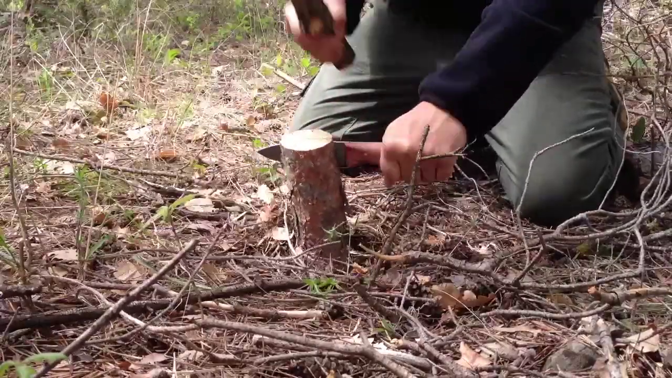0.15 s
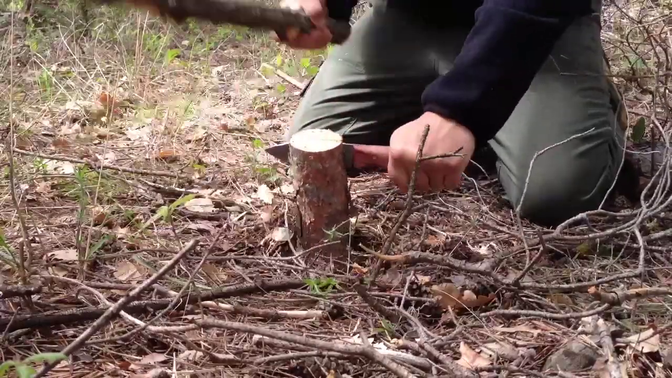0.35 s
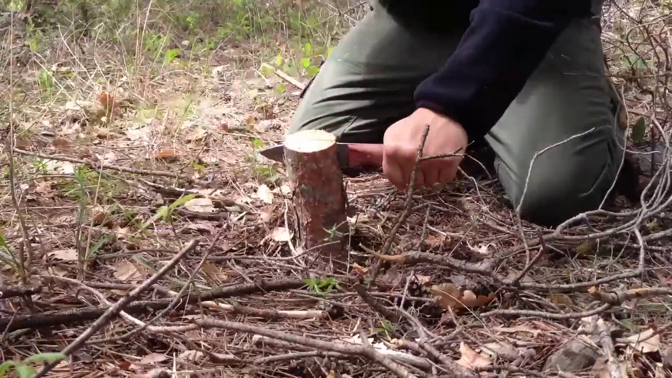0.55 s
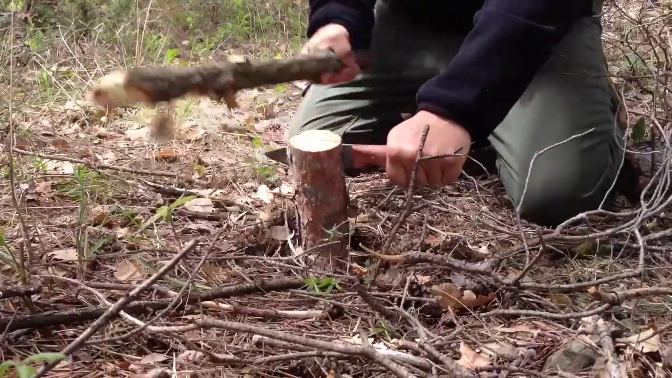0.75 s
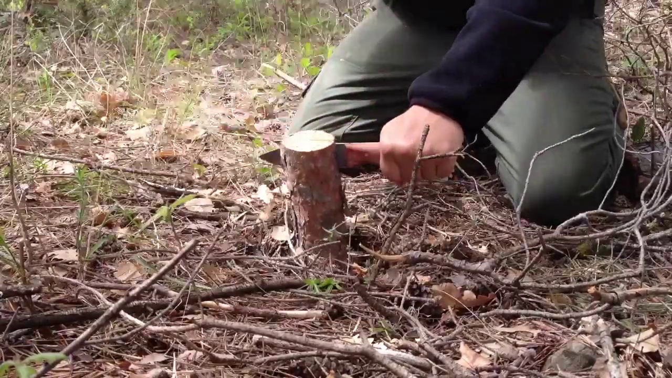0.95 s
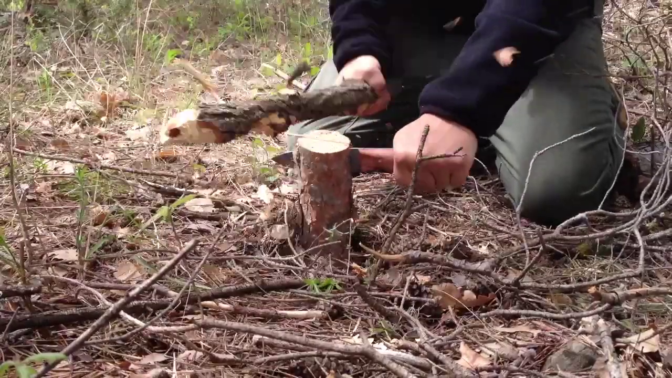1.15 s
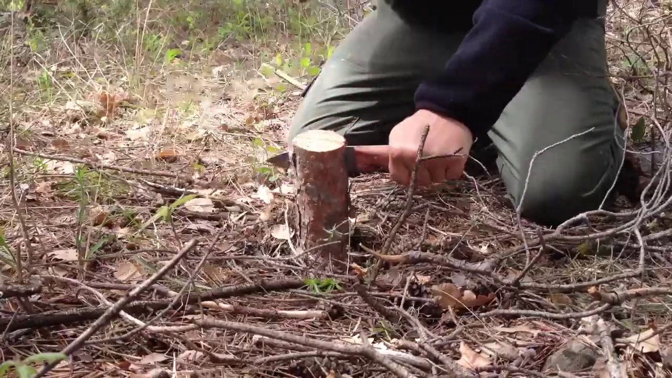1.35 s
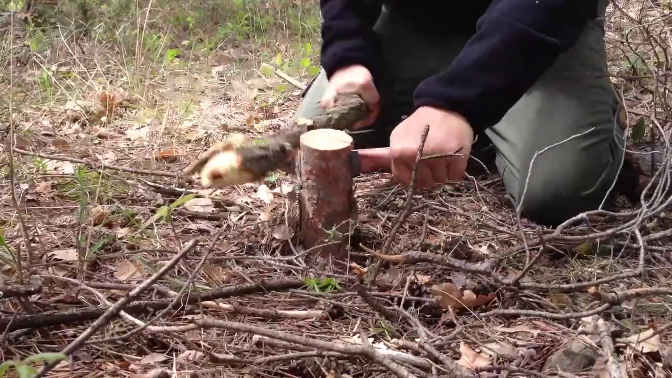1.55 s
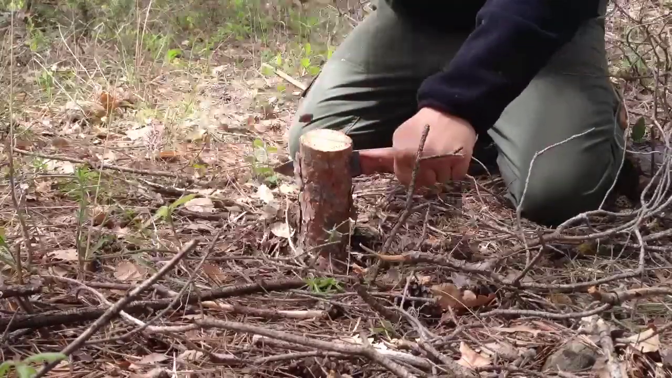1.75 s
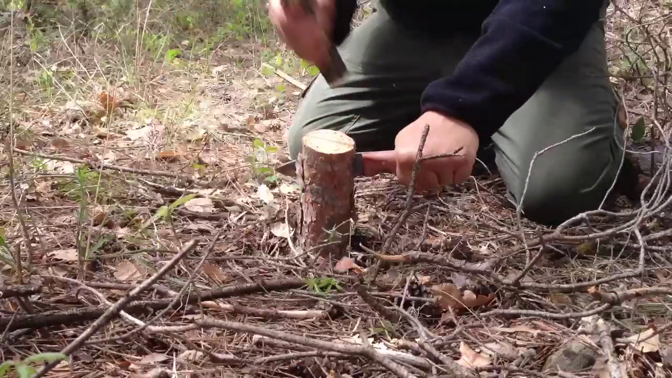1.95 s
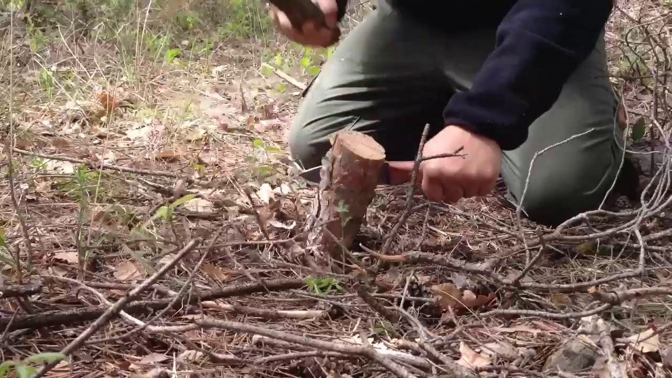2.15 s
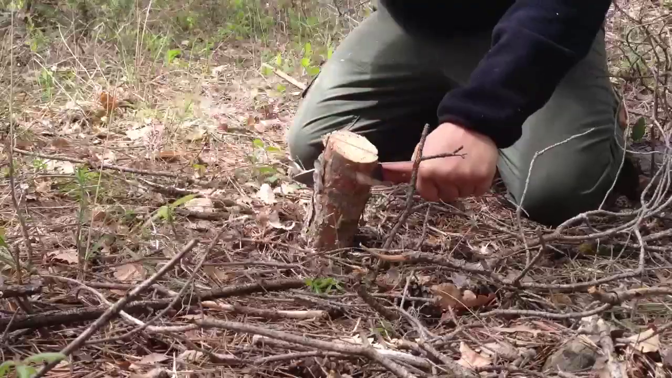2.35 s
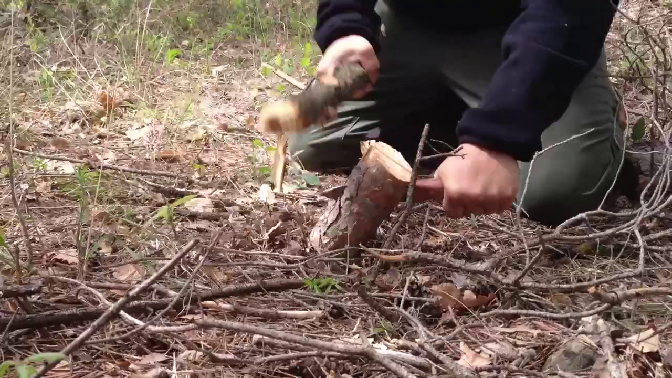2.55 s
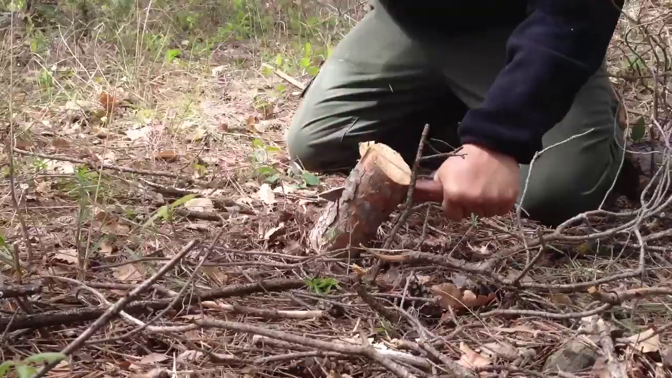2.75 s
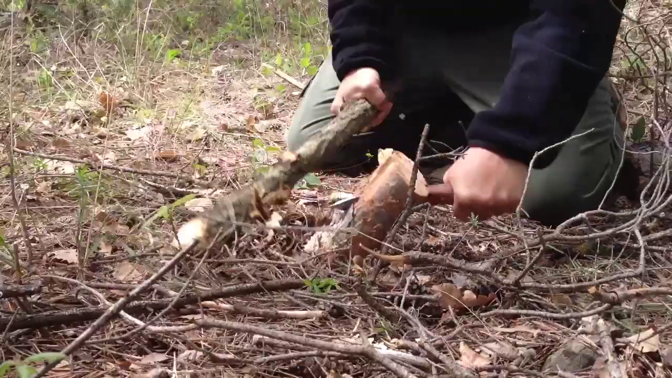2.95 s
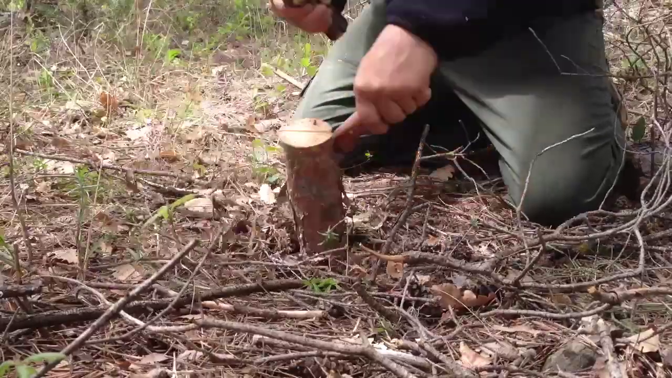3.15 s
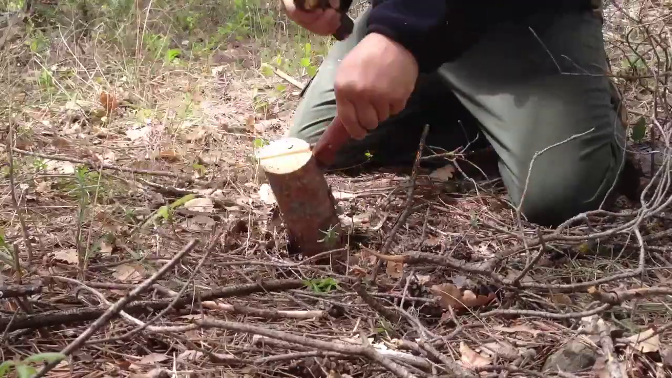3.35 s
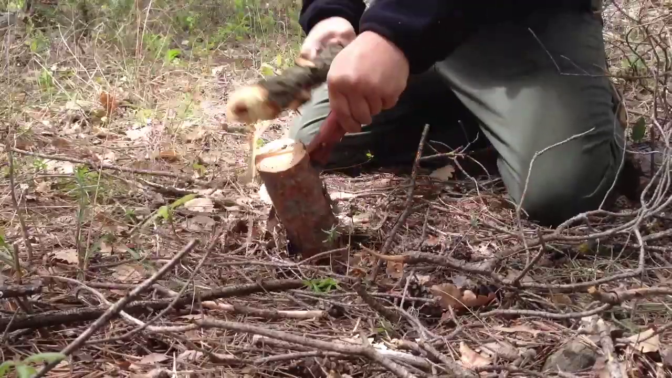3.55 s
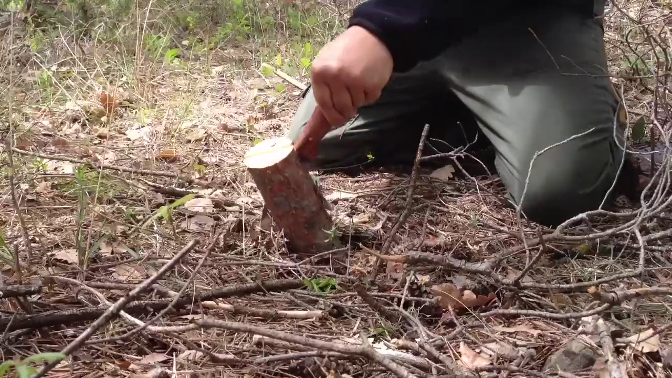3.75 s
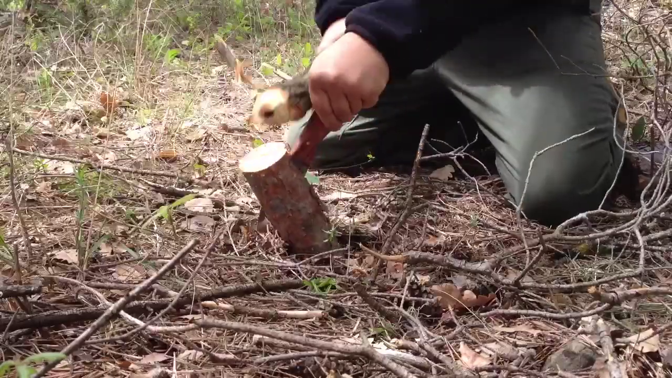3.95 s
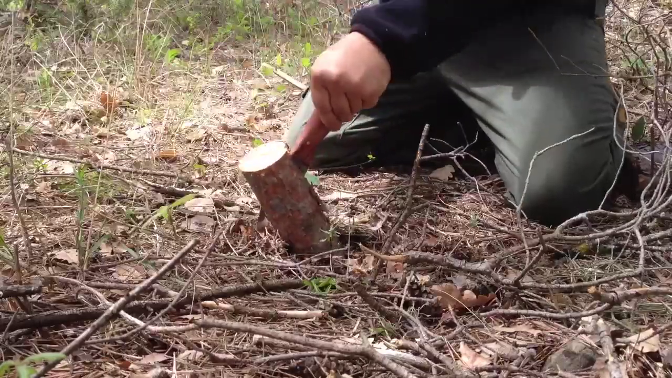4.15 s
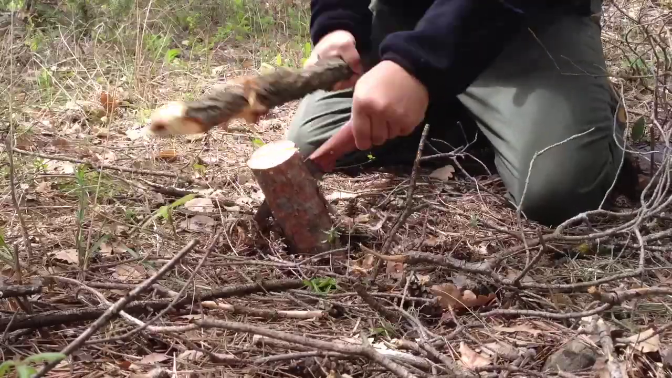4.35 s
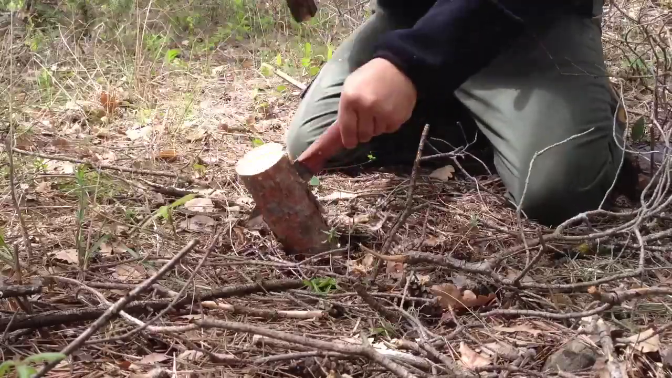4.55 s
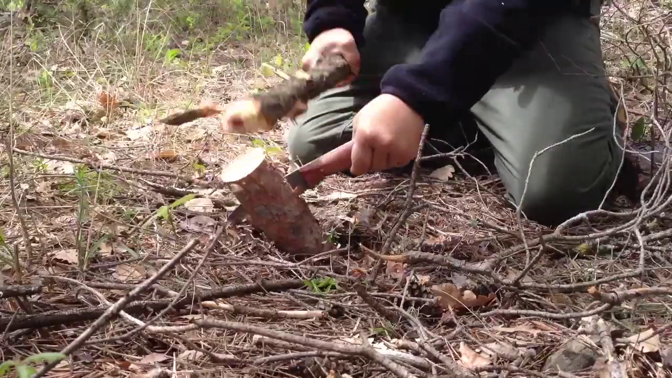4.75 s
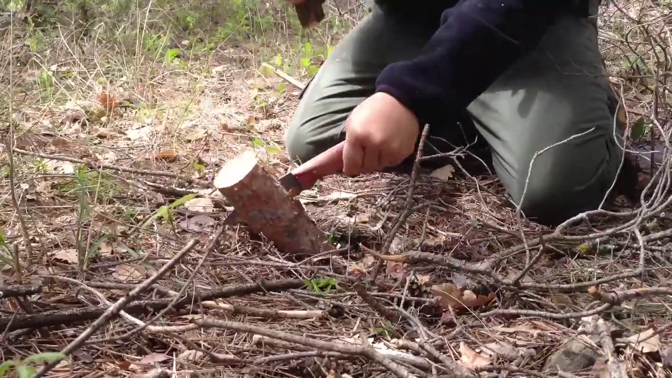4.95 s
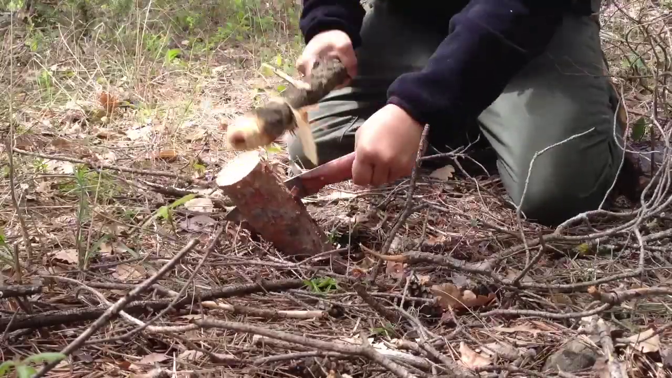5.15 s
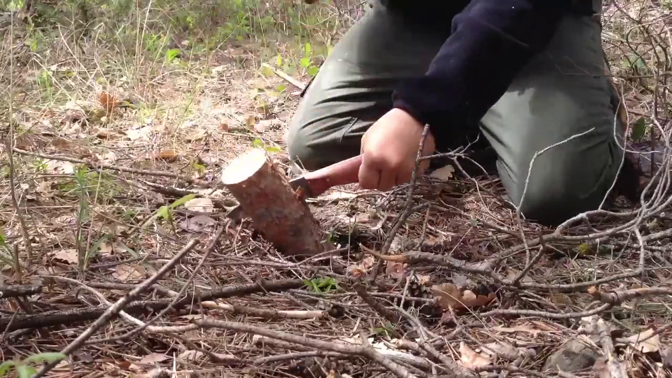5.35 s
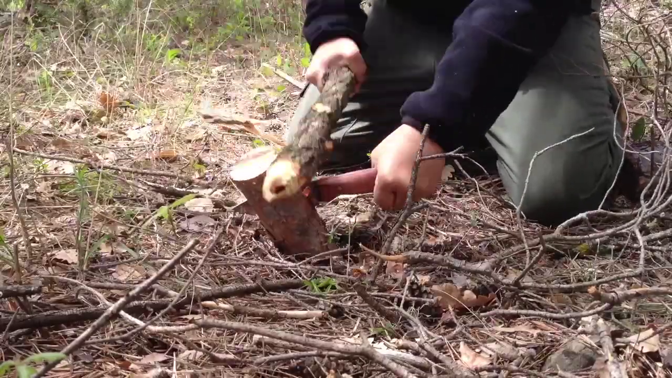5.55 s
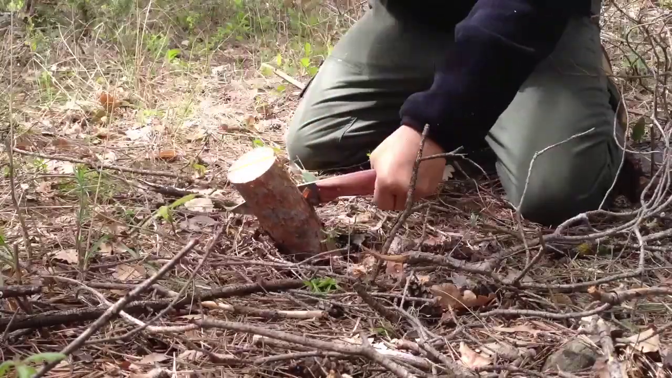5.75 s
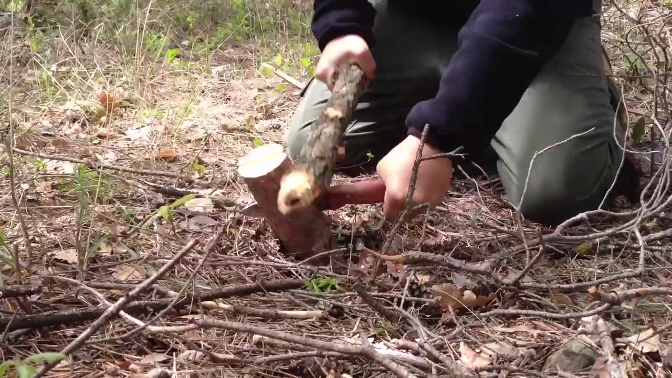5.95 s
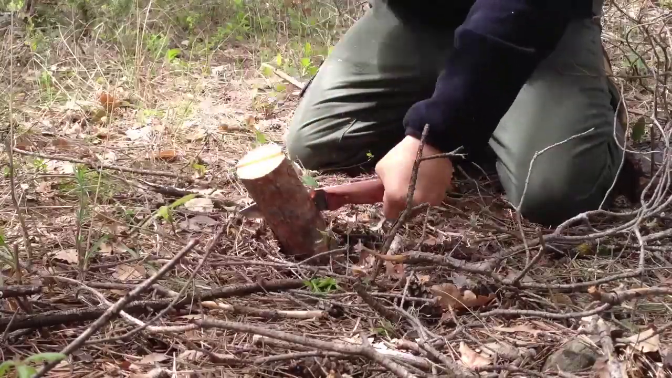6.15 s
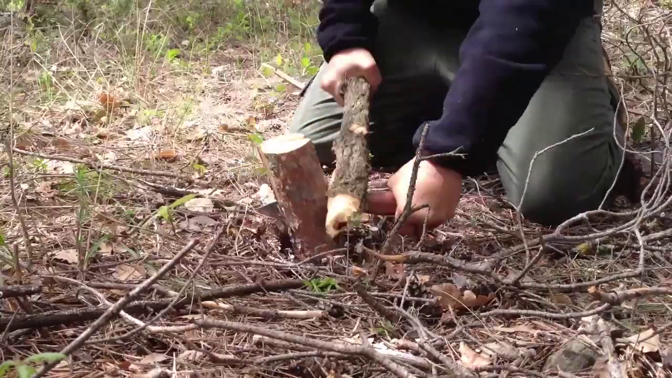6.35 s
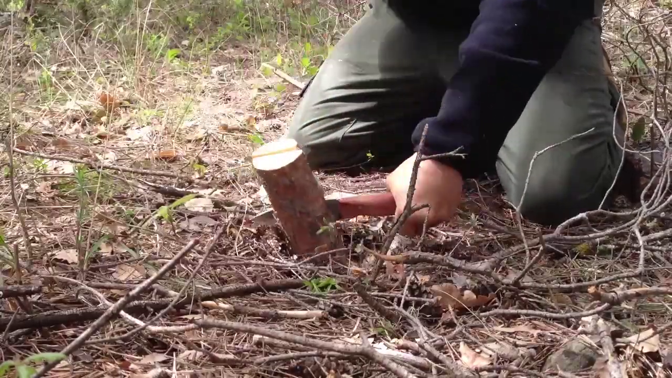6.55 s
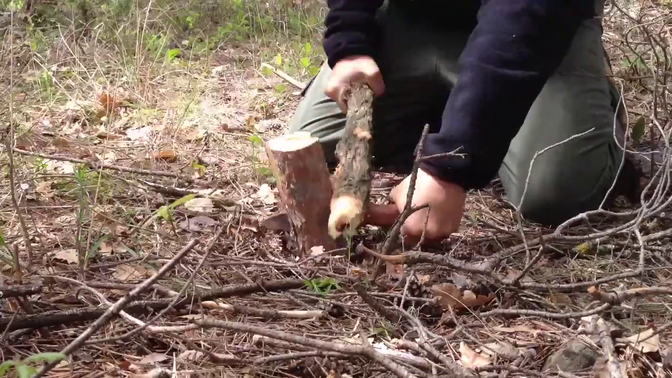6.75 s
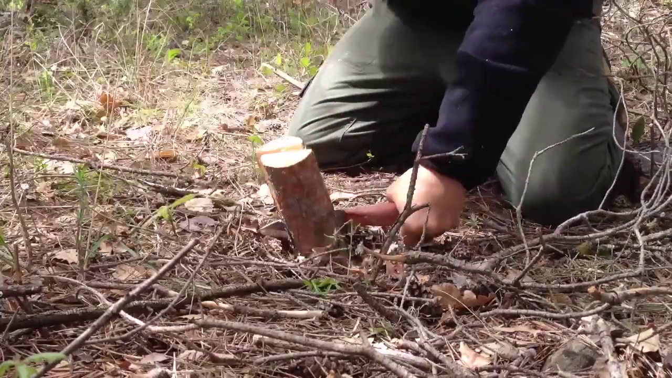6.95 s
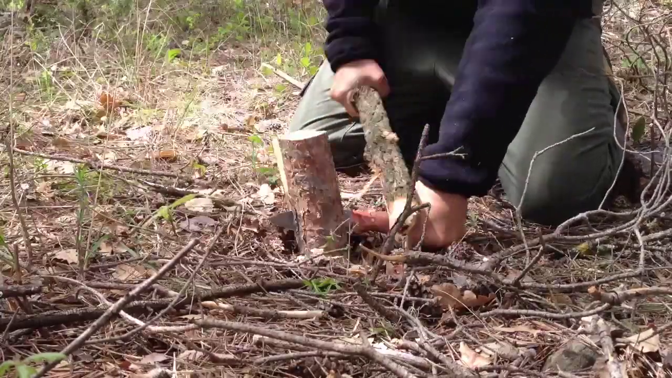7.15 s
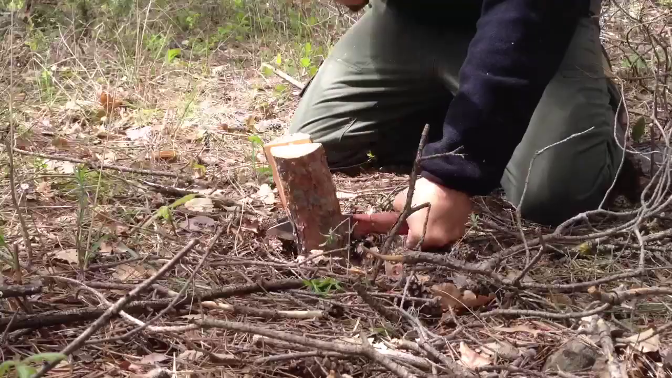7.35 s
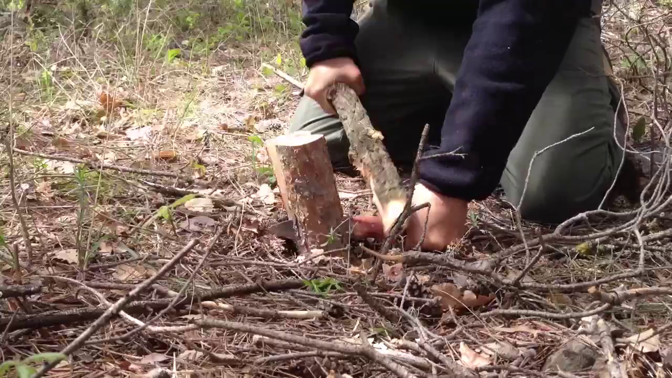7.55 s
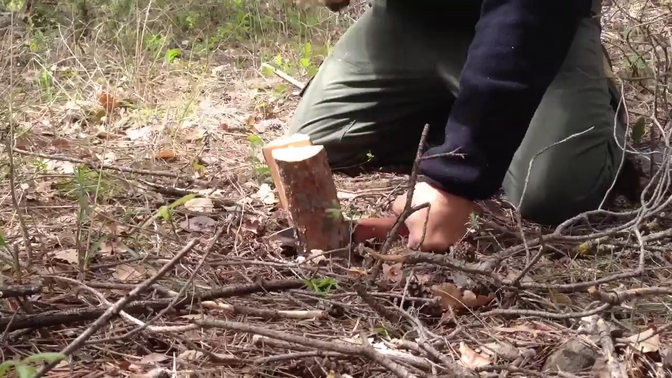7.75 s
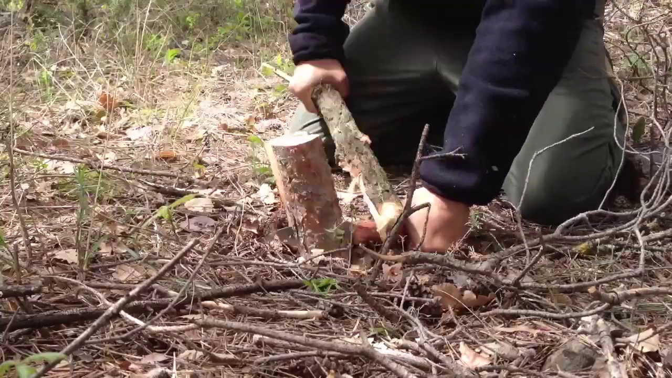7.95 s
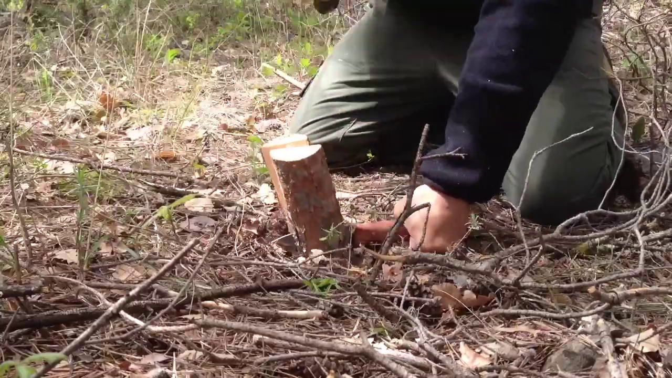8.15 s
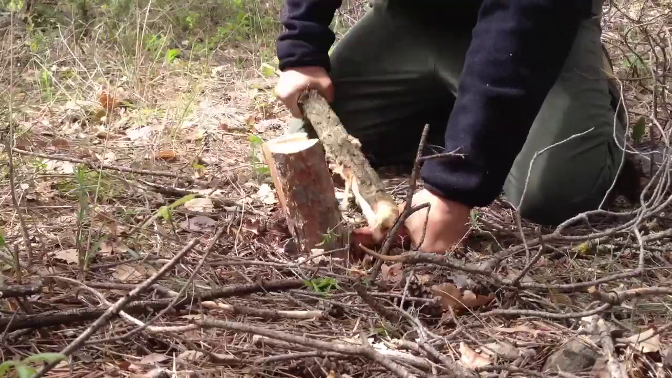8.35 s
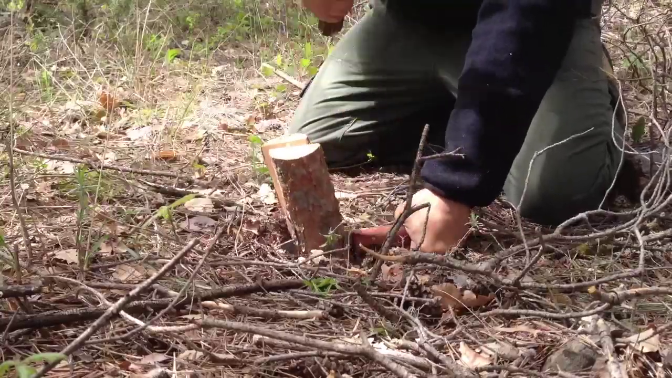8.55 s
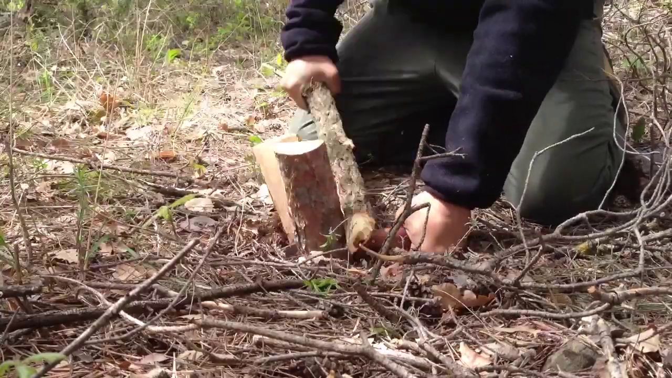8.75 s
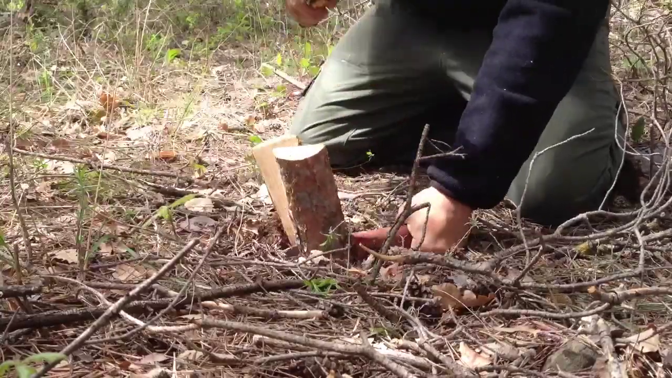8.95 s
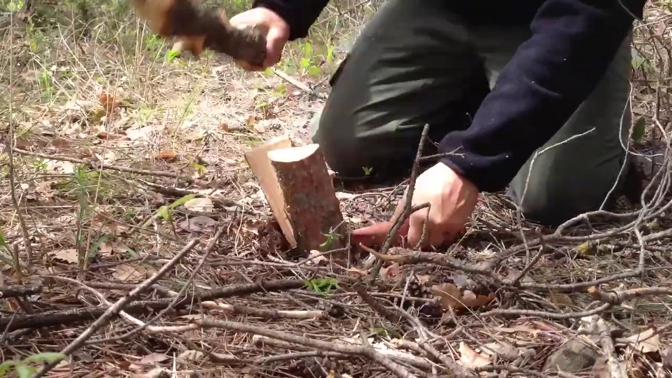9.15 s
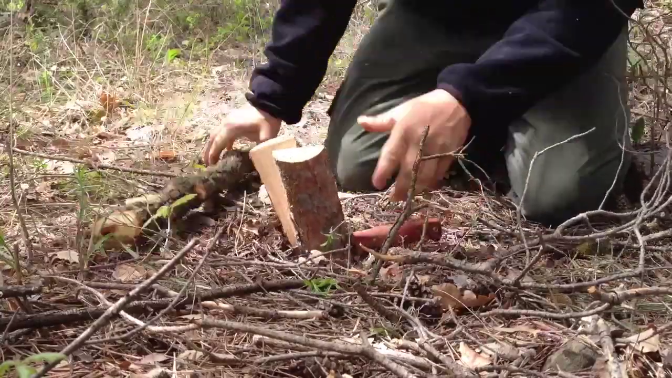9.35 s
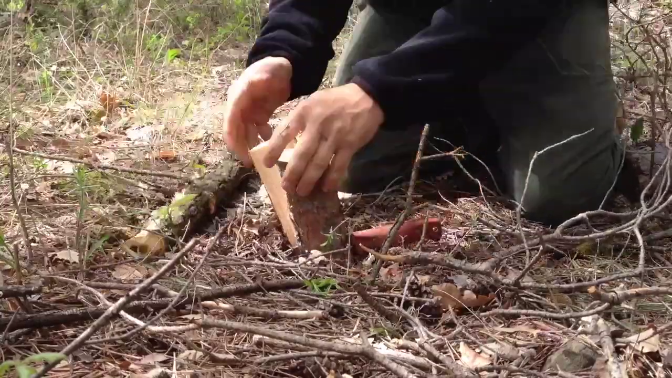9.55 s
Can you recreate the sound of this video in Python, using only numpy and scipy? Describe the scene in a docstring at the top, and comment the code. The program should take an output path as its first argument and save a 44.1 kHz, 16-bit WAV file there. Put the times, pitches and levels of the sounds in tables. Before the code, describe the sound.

A wooden stick knocks about twenty-one times on the back of a knife, driving it through a small log on dry forest litter.

```python
"""Stick knocking a knife through a log

A wooden stick knocks on the back of a knife, driving the blade down through a small log on a forest floor.
Each blow is a crack of crushed fibres, a short blade ring, wood modes, a low gliding thud and a shiver of litter.
Rebounds chatter, bark chips tick in two modes, and crackly noise swells rustle in the dry leaves.
Behind it filtered noise makes a thin echo and a background hiss whose level dips at many blows and swells back."""
import sys
import numpy as np
from scipy import signal
from scipy.fft import rfft, irfft, next_fast_len
from scipy.io import wavfile

SR = 44100
rng = np.random.default_rng(int(sys.argv[2]) if len(sys.argv) > 2 else 0)


def int16_out(signal):
    """Quantize to a 16-bit WAV file."""
    q = np.round(np.clip(np.atleast_2d(signal).T, -1, 1) * 32767)
    wavfile.write(sys.argv[1], SR, q.astype(np.int16))


N = 423351
T = np.arange(SR // 4) / SR  # time since a contact [s]

# stick on knife; levels of knock and clack are relative to the strength:
# (time [s], strength [dB], crush time [ms], brightness [dB per octave], knock [Hz], knock level [dB],
#  clack [Hz], clack level [dB], dip of the background hiss [dB])
BLOWS = [ (0.263, -33.5, 1.2, -5.5, 617, 1, 1320, -4, 0), (0.714, -20.5, 3.4, -1, 380, -3, 2300, -4.5, 0.5),
         (1.167, -25, 1.3, 2.5, 463, 5, 1490, -3.5, 5), (1.6064, -25, 0.46, -1, 410, -2.5, 834, -1.5, 2),
         (2.051, -23.5, 0.92, 0, 420, -3.5, 820, -8, 0),
         (2.4972, -26.5, 1.5, 2.5, 800, -1.5, 1620, -1.5, 3.5),
         (2.9496, -26.5, 3.1, 1, 465, 5, 1480, -12, -0.2), (3.547, -38, 0.63, -2.5, 387, 5, 1340, -8, 0),
         (3.9505, -20, 0.89, -3.5, 318, -0.5, 2040, -1.5, 4.5),
         (4.3312, -22, 0.41, -6, 400, -4.5, 1370, -4.5, 1.14),
         (4.719, -23, 1.7, -4.5, 380, -1.5, 1544, 2.5, 0.5),
         (5.1191, -23.5, 0.72, -3.5, 437, -7, 1410, -5, 5.5), (5.5379, -26, 1.1, 2, 445, 0, 1660, -7, 0),
         (5.939, -27.5, 1, 1.5, 510, 4, 1650, -1, 4.2), (6.343, -24, 1.4, -0.8, 594, 0, 1080, -2.5, 4),
         (6.7567, -25, 1.9, -0.7, 517, 0.5, 1094, -2, -0.5),
         (7.1773, -24.5, 0.94, -1, 517, -0.5, 1100, 0.5, 2.1),
         (7.577, -24, 1.46, 0.5, 420, -8, 1300, -6.5, 1.56),
         (7.9737, -26, 1.26, 0.9, 440, -5, 1460, -5, 1.75),
         (8.366, -27.5, 1.26, 1.3, 503, -5.5, 1240, -8, 2.5),
         (8.7515, -25, 0.95, -1, 495, -5, 1250, -9.5, 0)]
# colour of shaken needles and leaves, also used for the echo: (frequency [Hz], density [dB per Hz])
LITTER_SPECTRUM = [(200, 1), (500, -4), (1000, -6.5), (2500, -2), (4800, 0), (7000, 0), (9500, -6.5),
                   (15000, -11)]


def from_db(db):
    """Decibels to gain."""
    return 10 ** (np.asarray(db) / 20)


def rms_one(x):
    """Scale to rms 1."""
    return x / np.sqrt(np.mean(x ** 2) + 1e-20)


def at_level(x, db):
    """Scale a short sound so that its energy, spread over 10 ms, has this level."""
    span_s = 0.01
    return x * from_db(db) * np.sqrt(span_s * SR / (np.sum(x ** 2) + 1e-20))


def add(out, s, x):
    """Mix a short sound in at time s."""
    i = max(round(s * SR), 0)
    out[i:i + len(x)] += x[:max(N - i, 0)]


def resonance(x, hz, width_hz):
    """Two-pole band-pass with gain 1 on top; a narrower band rings longer."""
    radius = np.exp(-np.pi * width_hz / SR)
    zeros = np.array([1, 0, -1]) * (1 - radius * radius) / 2
    poles = [1, -2 * radius * np.cos(2 * np.pi * hz / SR), radius * radius]
    return signal.lfilter(zeros, poles, x + 1e-18)


def coloured(x, spectrum):
    """Give a noise this spectrum, drawn over log frequency; rms 1."""
    hz, db = np.transpose(spectrum)
    size = next_fast_len(len(x))
    bins_hz = np.maximum(np.arange(size // 2 + 1) * SR / size, 1)
    gain = from_db(np.interp(np.log(bins_hz), np.log(hz), db))
    return rms_one(irfft(rfft(x, size) * gain, size)[:len(x)])


def blows():
    """Crack of the stick, short ring of the clamped blade, knock and clack of the wood, thud of the ground."""
    # shiver and blade levels are re strength; a long crush muffles the blade
    shiver_db, blade_db, blade_db_per_ms = -22, 5.5, -1.3
    # a square hit is brighter, rings the blade more and drives the log harder: dB per dB/octave of brightness
    blade_per_brightness, thud_per_brightness = 1.6, 1.1
    out = np.zeros(N)
    for s, strength_db, crush_ms, tilt_db, knock_hz, knock_db, clack_hz, clack_db, _ in BLOWS:
        blade_hz, log_db, thud_db = cut_at(s)
        crack = struck(contact(crush_ms, after_db=-6, after_ms=5.8), crack_modes(), tilt_db)
        ring_db = blade_db + blade_per_brightness * tilt_db + blade_db_per_ms * crush_ms
        blade = at_level(blade_ring(blade_hz, crush_ms), ring_db)
        knock = at_level(wood_ring(knock_hz, width_hz=170, push_ms=0.29, rough=0.53), knock_db)
        clack = at_level(wood_ring(clack_hz, width_hz=140, push_ms=0.15, rough=0.44), clack_db)
        body = at_level(log_body(), log_db)
        ground = thud(hz=141.4, swell_s=0.012, stiffening=0.902, relax_s=.011)
        ground = at_level(ground, thud_db + thud_per_brightness * tilt_db)
        shiver = from_db(shiver_db) * litter(t60=0.15)
        add(out, s, from_db(strength_db) * (crack + blade + knock + clack + body + ground + shiver))
    return out


def cut_at(s):
    """Blade pitch [Hz], log level and thud level [dB re strength] at this stage of the cut."""
    # as the cut deepens the blade tends to ring higher, the splitting log to ring less, the ground to give less:
    # (time [s], blade pitch [Hz], log level [dB re strength], thud level [dB re strength])
    cut_stages = [(0.26, 4660, -4.5, 10), (1.17, 4580, -2.5, 2), (2.5, 4620, -2.5, -1),
                  (3.6, 5940, -2.5, -6.5), (4.7, 5920, 1, -8), (5.55, 5800, -3.5, -6.5),
                  (6.3, 6530, -15, -9), (7.6, 7080, -9.5, -10), (8.75, 6500, -23, -7)]
    times, *columns = np.transpose(cut_stages)
    return [np.interp(s, times, column) for column in columns]


def contact(crush_ms, after_db, after_ms):
    """Force of a contact: wood fibres give way in a dense burst with an even spectrum, then creak faintly."""
    age = T * 1000 / crush_ms
    creak = from_db(after_db) * np.exp(-T * 1000 / after_ms) * (1 - np.exp(-age))
    envelope = 2 * np.sqrt(age) * np.exp(-age ** 2) + creak
    burst = rfft(rng.standard_normal(len(T)) * envelope)
    even = irfft(burst / (np.abs(burst) + 1e-9), len(T))  # keep the phases, flatten the spectrum
    return even * envelope ** (1 / 3)


def crack_modes():
    """Damped modes of the stick and the gripped knife."""
    # (frequency [Hz], width [Hz], level [dB])
    modes = [(1683, 390, -11), (2330, 350, -5.5), (3016, 460, -3.5), (3583, 230, -5), (4564, 690, 0),
             (5820, 600, 1.5), (6850, 600, 0.5), (8700, 1420, -4.5), (10540, 2400, -4), (13700, 3100, -10)]
    return modes


def struck(force, modes, tilt_db=0):
    """Modes ringing in parallel under one force; a harder contact tilts them up about 3 kHz."""
    ring = 0
    for k, (hz, width_hz, db) in enumerate(modes):
        mode = at_level(resonance(force, hz, width_hz), db + tilt_db * np.log2(hz / 3000))
        ring = ring + (-1) ** k * mode  # alternate polarity
    return ring


def blade_ring(hz, crush_ms):
    """The blade is pinched in the wood, so its ring dies within milliseconds."""
    ring = resonance(contact(crush_ms, after_db=-12, after_ms=8.2), hz, width_hz=610)
    return resonance(ring, hz, width_hz=2800)


def wood_ring(hz, width_hz, push_ms, rough):
    """A wood mode set off by one smooth push and the ragged crushing that follows."""
    age = T * 1000 / push_ms
    push = at_level(resonance(age * np.exp(-age), hz, width_hz), 0)
    crushing = contact(crush_ms=1.72, after_db=6.0, after_ms=6.9)
    ragged = at_level(resonance(crushing, hz, width_hz), 0)
    return resonance(push + rough * ragged, hz, 2 * hz)


def log_body():
    """One push sets all the modes of the log ringing, each with a strength of its own."""
    # hollow body of the log, levels before the random spread: (frequency [Hz], width [Hz], level [dB])
    log_modes = [(329, 100, 0), (505, 240, 0.5), (723, 112, 1), (1044, 350, -6.5)]
    spread_db = 5.8
    push = T / .0002 * np.exp(-T / 0.00016)
    ring = 0
    for k, (hz, width_hz, db) in enumerate(log_modes):
        mode = resonance(resonance(push, hz, width_hz), hz, hz)
        ring = ring + at_level(mode, db + rng.normal(0, spread_db)) * (-1) ** k
    return ring


def thud(hz, swell_s, stiffening, relax_s):
    """Weight sinks into springy ground: a few low cycles swell and die, drooping as the soil unloads."""
    pitch = hz * (0.89 + stiffening * np.exp(-T / relax_s))  # starts above hz, ends a little below
    age = T / swell_s
    envelope = age ** 3 / (1 + age ** 6) * np.exp(-T / 0.011)
    return envelope * np.sin(2 * np.pi * np.cumsum(pitch) / SR)


def litter(t60):
    """Dry needles and leaves shiver after the jolt; the fade passes gain 1 at 40 ms."""
    fade = from_db(-60 * (T - .04) / t60)
    return leaves(grain_db=3.0) * fade * (1 - np.exp(-T / 0.0011))


def leaves(grain_db):
    """Crackly noise of many small dry things touching: random grain levels make it spiky."""
    grain_levels_db = grain_db * np.minimum(rng.exponential(1, len(T)), 4)
    grains = rng.standard_normal(len(T)) * from_db(grain_levels_db)
    return coloured(grains, LITTER_SPECTRUM)


def chatter():
    """Rebounds and light touches ring stick and blade without moving the log."""
    # separate touches where the stick lands unevenly or bounces: (time [s], level [dB])
    touches = [(0.2728, -35), (0.7195, -19), (1.165, -19.5), (2.0604, -22), (3.963, -25), (4.3442, -19.5),
               (4.7384, -28), (5.1326, -26), (5.553, -26.4)]
    # after every blow the knife kicks back against the stick; level re strength
    rebound_s, rebound_db = .005, -7.5
    rebounds = [(s + rebound_s, db + rebound_db) for s, db, *_ in BLOWS]
    out = np.zeros(N)
    for s, db in rebounds + touches:
        blade_hz, _, _ = cut_at(s)
        crack = struck(contact(crush_ms=1.34, after_db=-8, after_ms=7.9), crack_modes(), tilt_db=-1.5)
        blade = blade_ring(blade_hz, crush_ms=1.2)
        add(out, s, at_level(crack, db - 1.0) + at_level(blade, db - 5.0))
    return out


def chips():
    """Bark chips and twigs tick in the litter: each snaps brightly and rings for a moment in two modes."""
    # (time [s], low mode [Hz], high mode [Hz], body level [dB], snap level [dB])
    ticks = [(1.053, 1640, 3000, -44.5, -47), (1.2565, 1190, 2530, -30, -32),
             (1.676, 1590, 2850, -44.5, -42.5), (2.1604, 1800, 2300, -51.5, -44),
             (2.2733, 1600, 2000, -42, -43.5), (3.898, 1300, 1740, -49, -55),
             (7.339, 1490, 2410, -39.5, -43.5), (7.37, 1500, 2340, -62, -55),
             (7.6844, 1600, 2400, -54, -40.5), (8.464, 1600, 2440, -63, -47.5),
             (9.306, 1300, 2260, -53, -44), (9.3524, 1810, 3000, -61, -53)]
    # brittle snap of dry bark: (frequency [Hz], width [Hz], level [dB])
    snap_modes = [(4580, 430, -1), (5700, 900, 3.5), (7100, 1200, 1), (11700, 2700, -8)]
    out = np.zeros(N)
    for s, low_hz, high_hz, body_db, snap_db in ticks:
        force = contact(crush_ms=1.0, after_db=-2.5, after_ms=5.1)
        body = struck(force, [(low_hz, 230, -2), (high_hz, 340, 0)])
        body = resonance(body, high_hz, 2 * high_hz)
        snap = struck(force, snap_modes)
        add(out, s, at_level(body, body_db) + at_level(snap, snap_db))
    return out


def rustles():
    """Short swells of dry crackle, with a bump where weight comes down."""
    # litter stirring as the log tips, fibres tearing as it splits, then sleeve, stick and hand settling:
    # (time [s], time to peak [s], pitch [Hz], rustle level [dB], soft bump level [dB])
    stirs = [(2.135, 0.031, 5500, -44, -70), (8.765, 0.025, 4400, -43, -70), (9.14, 0.08, 5000, -51.5, -70),
             (9.306, 0.01, 4000, -43, -49), (9.415, 0.029, 6500, -46, -70)]
    out = np.zeros(N)
    for s, peak_s, hz, rustle_db, bump_db in stirs:
        age = T / peak_s
        crisp = resonance(leaves(grain_db=7.5), hz, 1.1 * hz)
        swell = age * np.exp(-age ** 2 / 2)
        bump = thud(hz=150, swell_s=0.014, stiffening=.7, relax_s=0.013)
        add(out, s, at_level(crisp * swell, rustle_db) + at_level(bump, bump_db))
    return out


def forest_echo(x, t60, wet_db):
    """Trunks scatter a thin, short reverberation: convolution with decaying coloured noise."""
    t = np.arange(SR // 2) / SR
    noise = coloured(rng.standard_normal(len(t)), LITTER_SPECTRUM)
    scatter = noise * from_db(-60 * t / t60) * (1 - np.exp(-t / .015))
    scatter = scatter / np.sqrt(np.sum(scatter ** 2))
    return from_db(wet_db) * signal.fftconvolve(x, scatter)[:N]


def background_hiss():
    """A smooth hiss over a low, wavering rush; the level rises at a steady rate and steps by each blow's dip."""
    # forest hiss: (frequency [Hz], density [dB per Hz])
    hiss_spectrum = [(350, -41), (600, -7), (697, -5), (766, -4.5), (1360, -0.5), (1580, -1.5),
                     (2070, -2.5), (2950, -2), (3920, -2), (4490, 0.5), (5220, -4.5), (6580, -2.5),
                     (9630, -15.5), (12500, -12), (15500, -22)]
    # low rush: (frequency [Hz], density [dB per Hz])
    rush_spectrum = [(18, -72), (30, -60), (70, -18.5), (108, -18), (175, -3.5), (247, -1), (339, -3.5),
                     (408, -2), (447, -4.5), (538, -8.5), (700, -18.5), (910, -38), (1540, -120)]
    start_db, recover_db_per_s, dip_s = -55.5, 4.0, 0.026  # dip_s: time the hiss takes to sink
    hiss_db, rush_db = 0.5, -4  # relative to the swell
    t = np.arange(N) / SR
    dips_db = sum(dip_db * np.clip((t - s) / dip_s, 0, 1) for s, *_, dip_db in BLOWS)
    swell = from_db(start_db + recover_db_per_s * t - dips_db)
    waver_db = 1.2 * np.interp(np.arange(N), np.linspace(0, N, 90), rng.standard_normal(size=90))
    hiss = from_db(hiss_db) * coloured(rng.standard_normal(N), hiss_spectrum)
    rush = from_db(rush_db + waver_db) * coloured(rng.standard_normal(N), rush_spectrum)
    return swell * (hiss + rush)


def scene():
    """The work close by, the forest around it."""
    work = blows() + chatter() + chips() + rustles()
    return (work + forest_echo(work, t60=0.24, wet_db=-32.5) + background_hiss())[None]


def record(dry):
    """The small microphone loses the deep bass, the highest peaks are rounded, the top is cut."""
    cutoff_hz = 15600
    thin = signal.sosfilt(signal.butter(2, 55, "high", fs=SR, output="sos"), dry)
    rounded = thin / (1 + thin ** 8) ** (1 / 8)
    return signal.sosfilt(signal.ellip(10, .2, 80, cutoff_hz, fs=SR, output="sos"), rounded)


dry = scene()
out = record(dry)
int16_out(out)
```